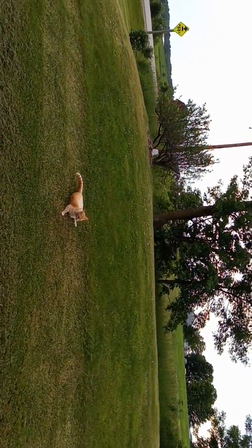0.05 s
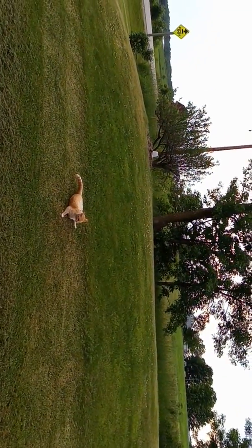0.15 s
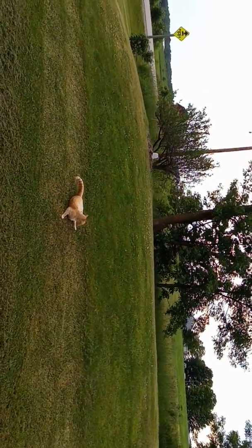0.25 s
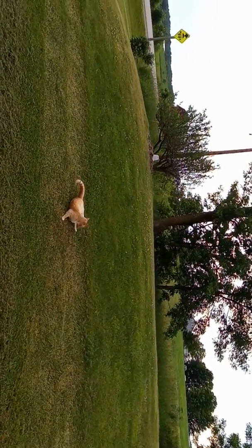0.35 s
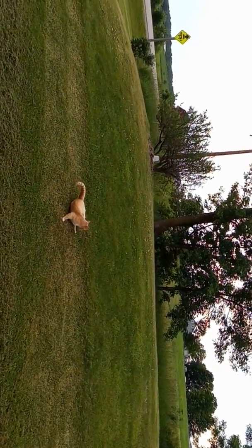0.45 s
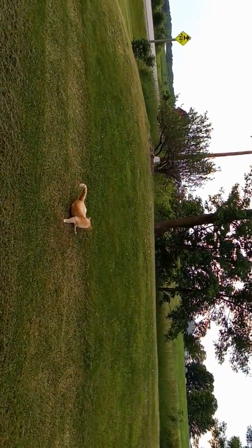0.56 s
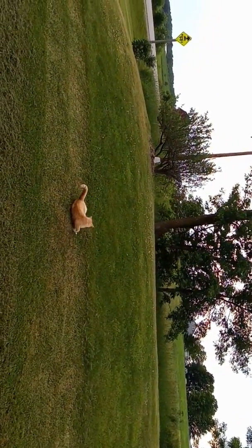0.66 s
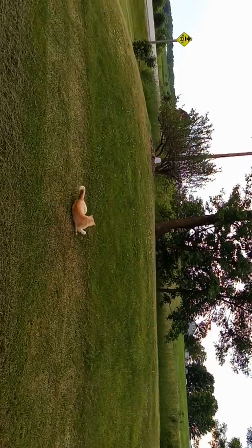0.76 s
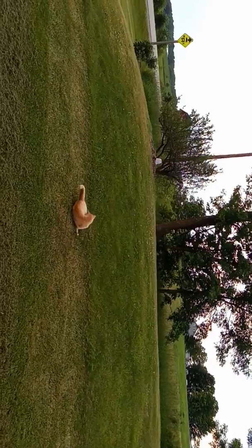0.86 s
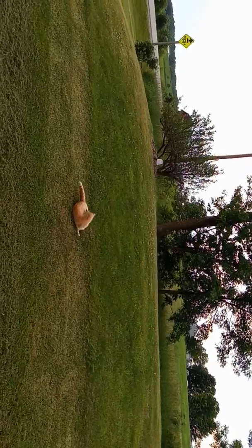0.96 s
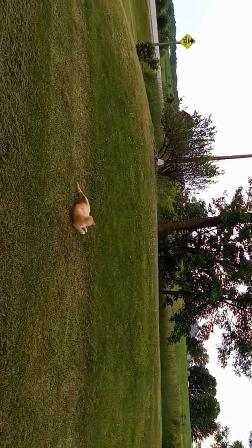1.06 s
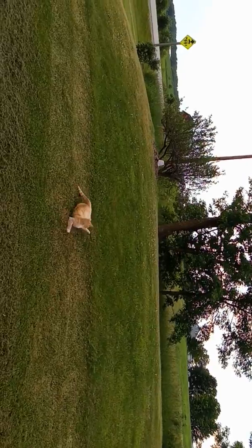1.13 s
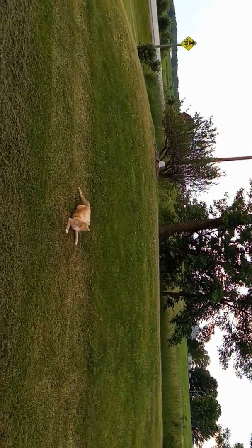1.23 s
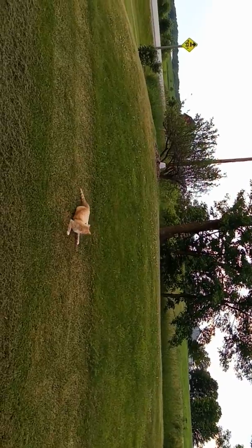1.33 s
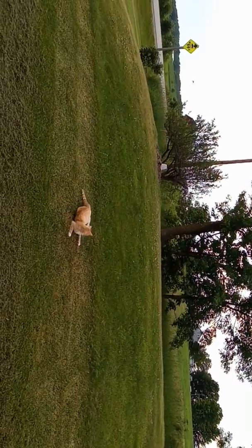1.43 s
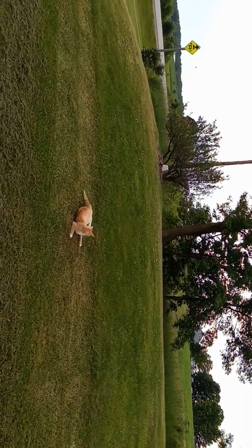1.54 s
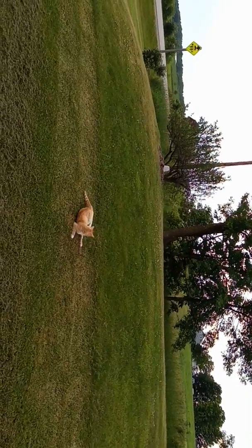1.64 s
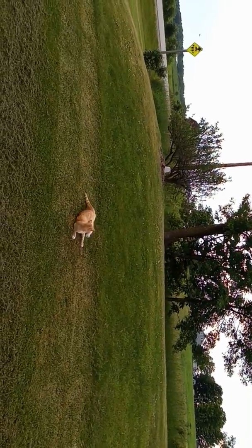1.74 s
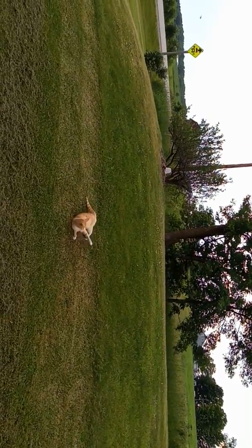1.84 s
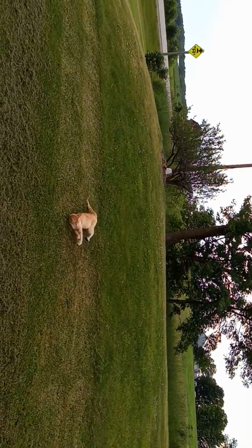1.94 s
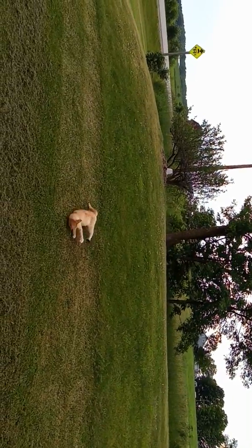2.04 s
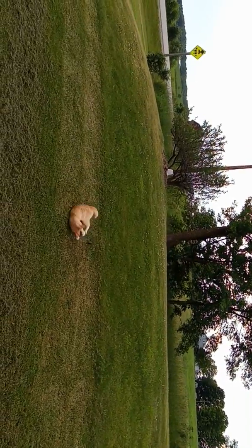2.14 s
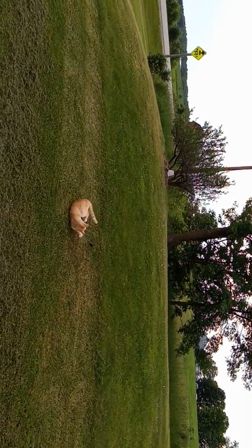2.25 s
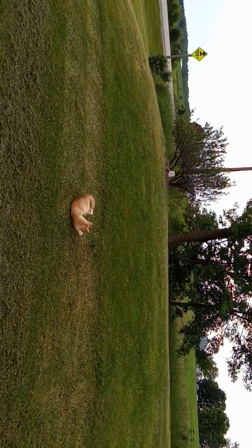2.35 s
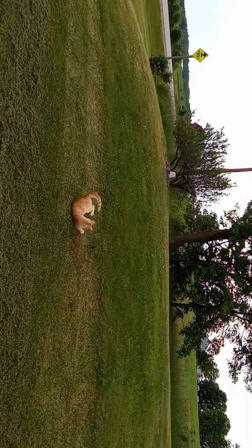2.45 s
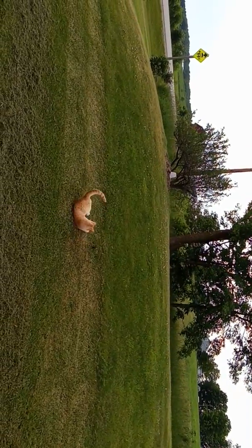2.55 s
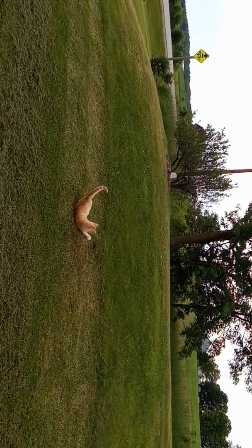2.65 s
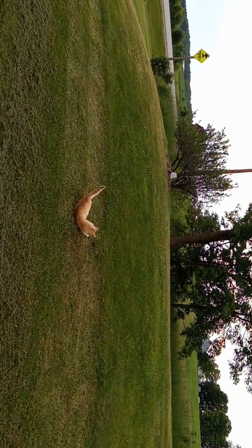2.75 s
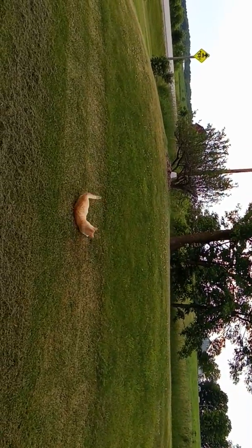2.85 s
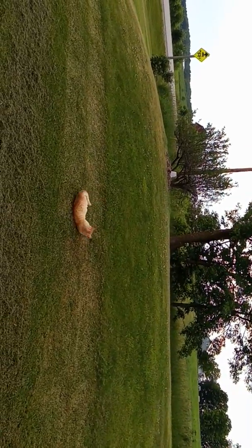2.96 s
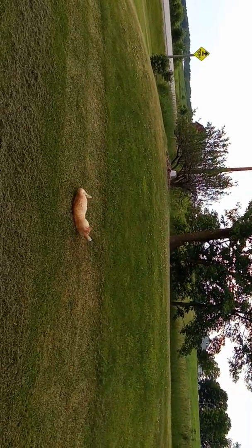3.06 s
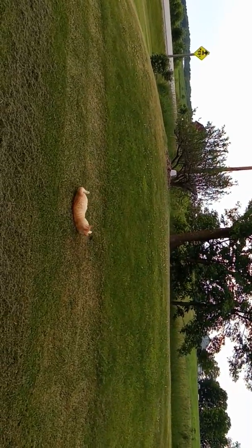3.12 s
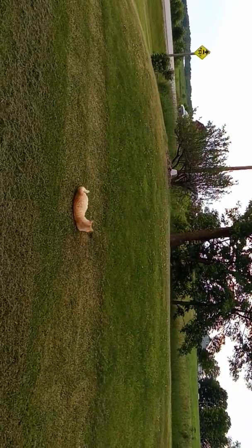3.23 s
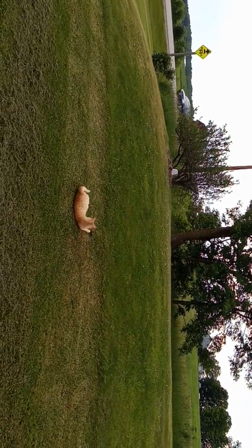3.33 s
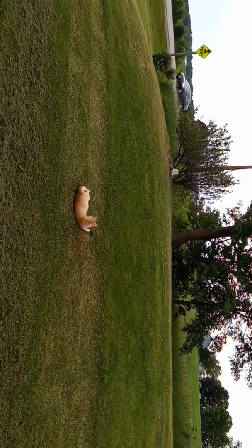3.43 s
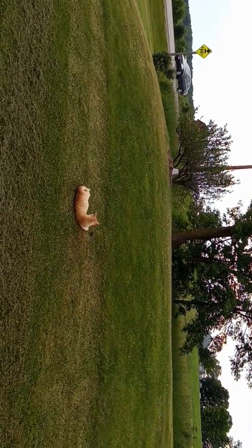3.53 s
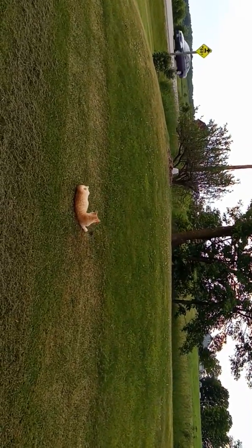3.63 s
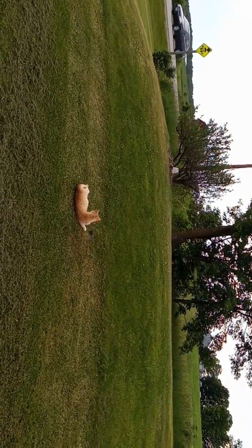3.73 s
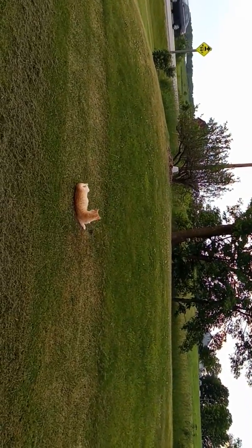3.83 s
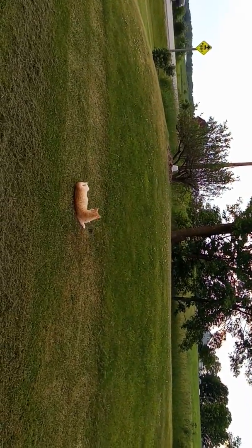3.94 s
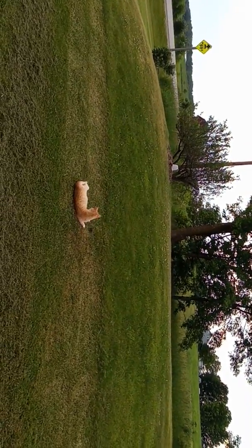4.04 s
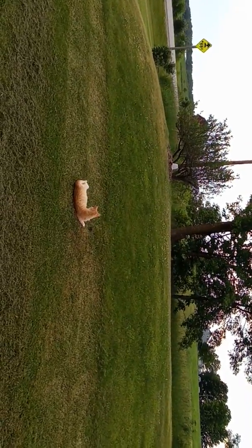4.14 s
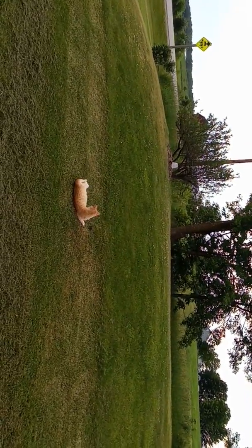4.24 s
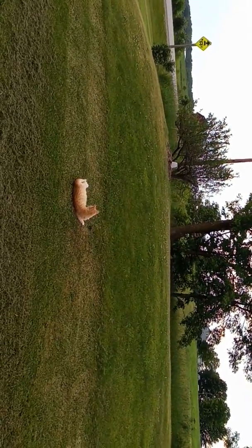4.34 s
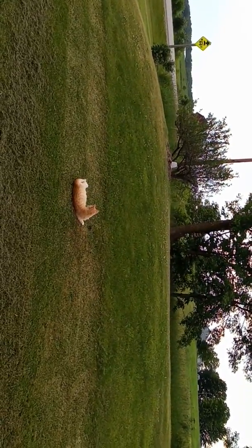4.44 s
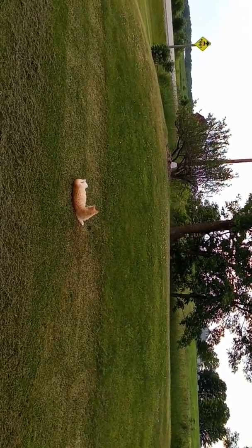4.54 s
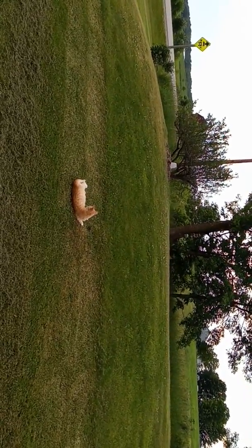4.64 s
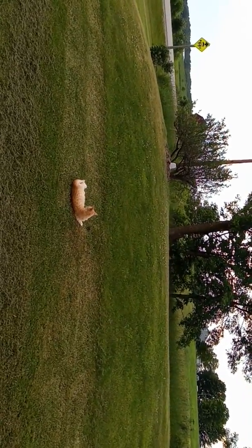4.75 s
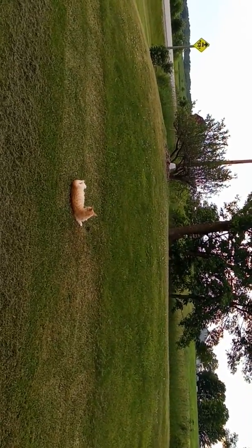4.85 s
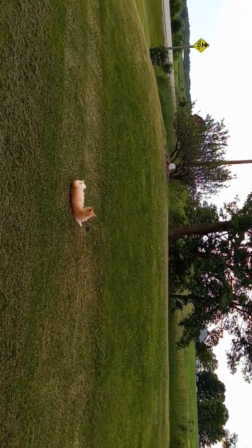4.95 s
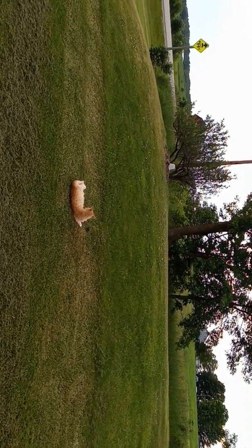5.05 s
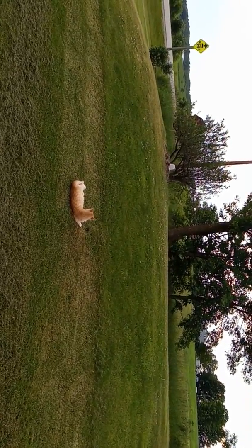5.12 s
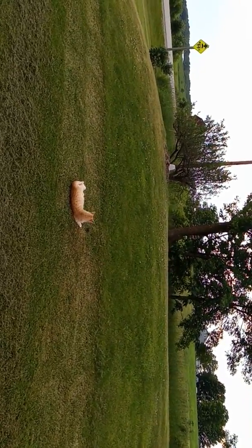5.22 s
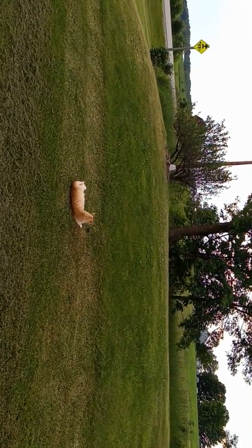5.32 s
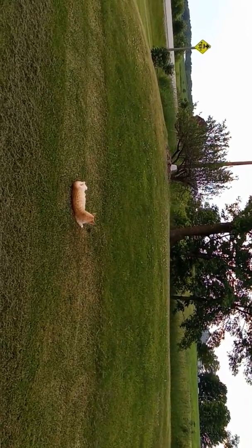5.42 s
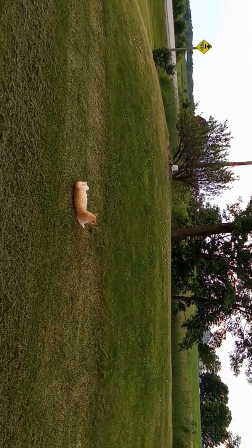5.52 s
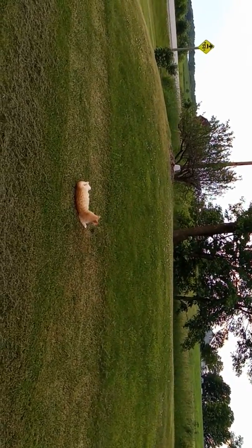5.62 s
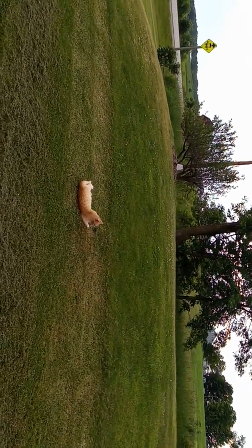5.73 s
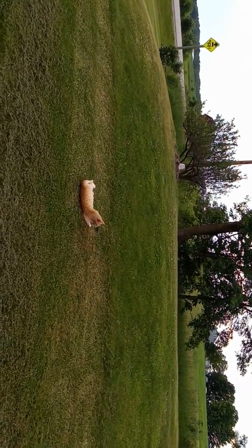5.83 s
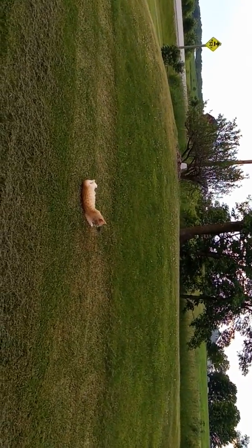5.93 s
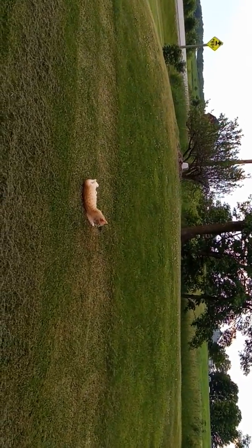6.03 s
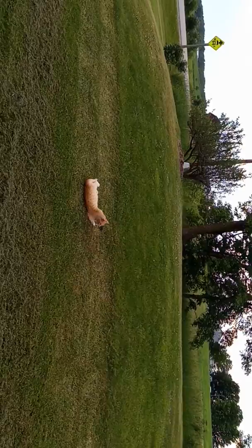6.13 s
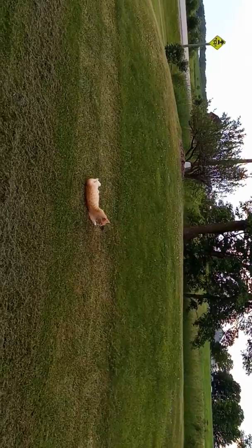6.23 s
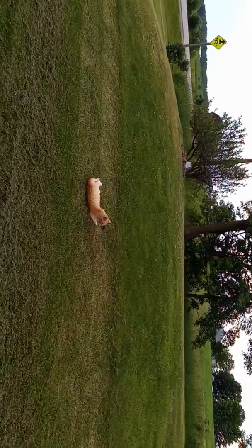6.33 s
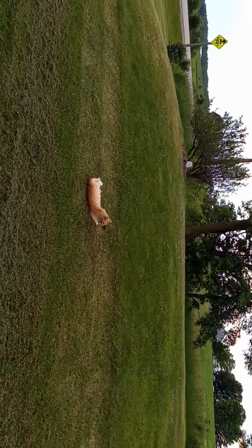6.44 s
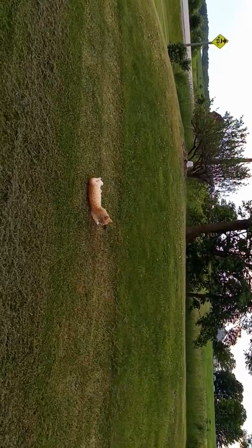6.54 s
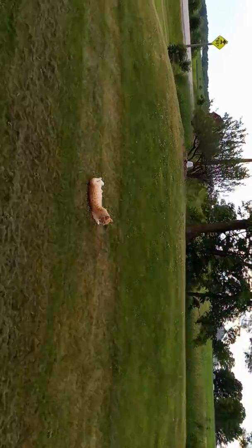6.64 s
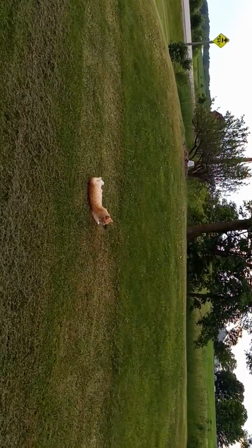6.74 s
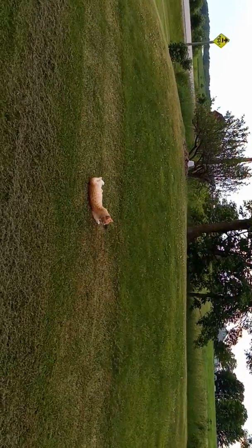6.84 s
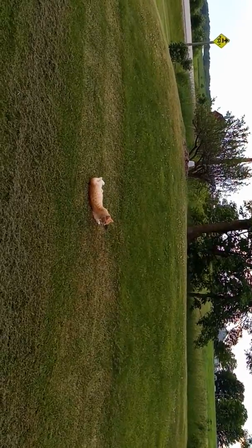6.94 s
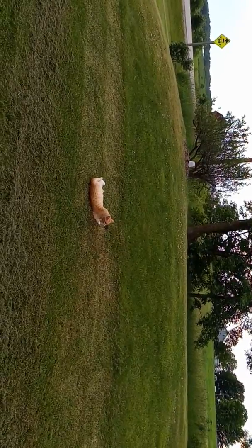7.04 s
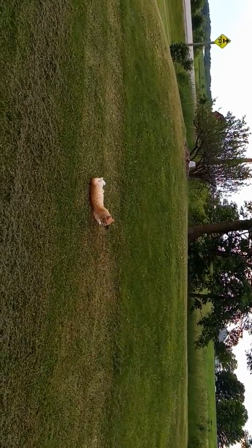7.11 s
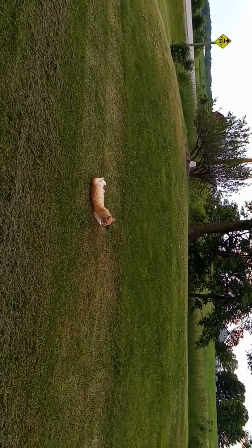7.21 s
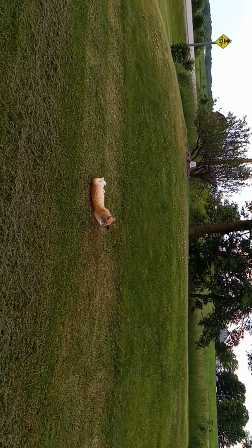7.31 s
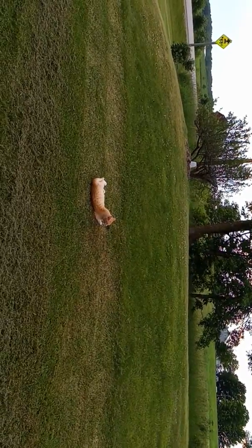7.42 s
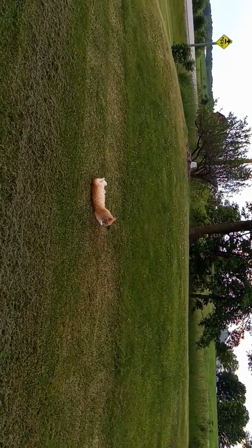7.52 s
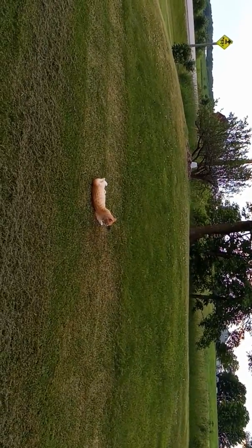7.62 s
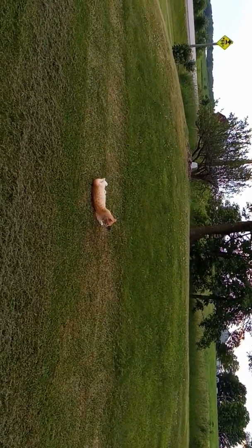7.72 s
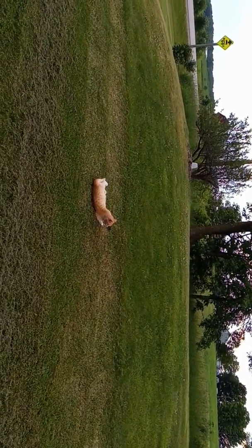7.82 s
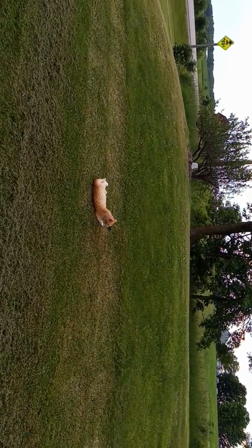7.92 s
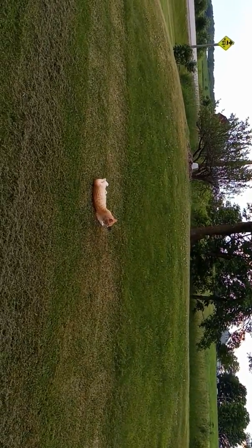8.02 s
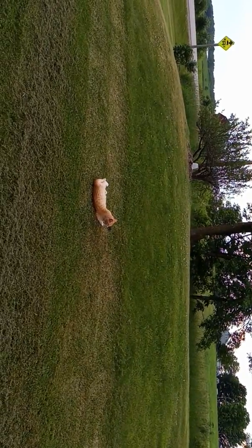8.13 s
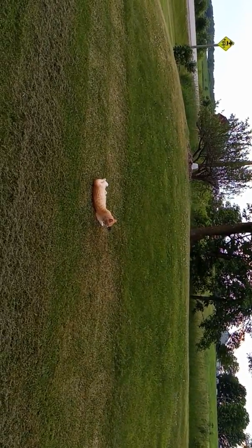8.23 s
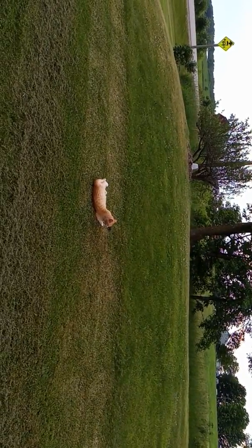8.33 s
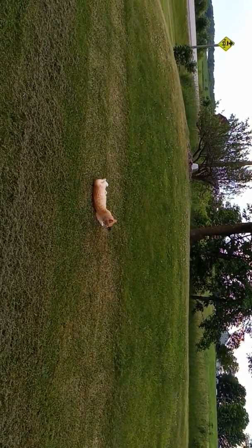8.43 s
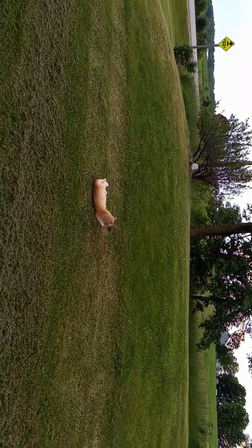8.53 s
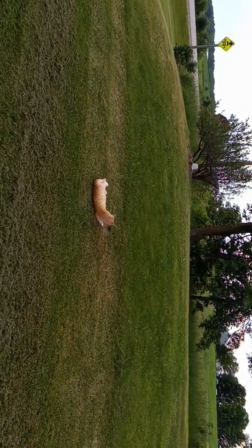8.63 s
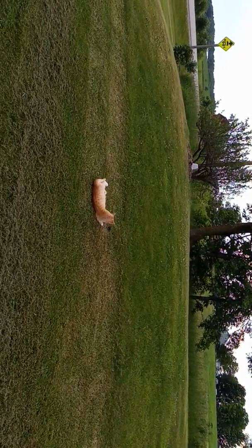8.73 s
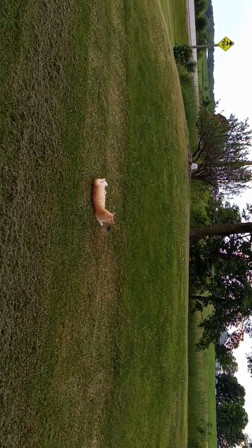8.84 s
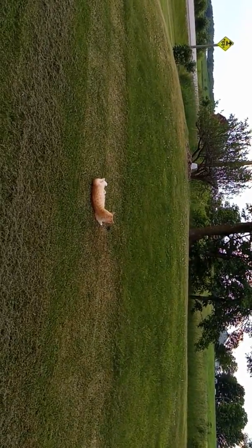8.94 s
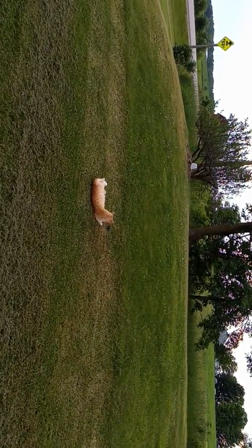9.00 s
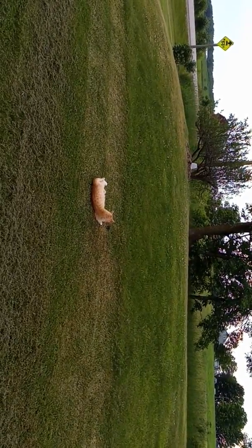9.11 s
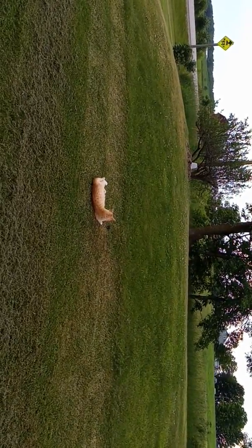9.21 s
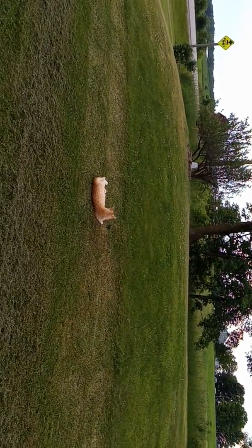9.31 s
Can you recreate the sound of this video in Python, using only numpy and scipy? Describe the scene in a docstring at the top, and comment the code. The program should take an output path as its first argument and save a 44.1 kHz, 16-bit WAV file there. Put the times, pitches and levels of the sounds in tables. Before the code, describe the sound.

A car passes on a country road beyond a wide lawn, its tyre roar swelling and fading while sparrows chirrup and a bird whistles three times.

```python
"""On a country road beyond a wide lawn a car passes: exhaust rumble, tyre roar and hiss swell and fade.
The car is shaped noise, heard by two microphone ports in one case from a changing bearing.
One bird whistles three times and sparrows chirrup and chip, all near sines with gliding pitch.
Tree echoes follow the birds; a thin far tone comes late; country noise and microphone hiss lie beneath.
"""
import sys
import numpy as np
from scipy import signal
from scipy.io import wavfile
from scipy.ndimage import uniform_filter1d

SR = 44100
rng = np.random.default_rng(int(sys.argv[2]) if len(sys.argv) > 2 else 0)


def materialize(psi):
    """Save the field psi as 16-bit PCM at rate SR to the path in sys.argv[1].

    A 1-D psi becomes a single channel; in a 2-D psi each row is a channel.
    """
    bounded = np.clip(np.atleast_2d(psi).T, -1, 1)
    quanta = np.round(bounded * 32767).astype(np.int16)
    wavfile.write(sys.argv[1], SR, quanta)


N = 413216  # samples

# --- the tables and settings
FRAME = 2048  # samples per short-time spectrum
NEAREST_S, SPEED_M_PER_S, ROAD_M = 4.63, 18.67, 33.1  # the car's path along the straight road
BASS_BELOW_HZ = 300  # parts under this follow the bass curve
# basic spectrum of the car across the grass, before the part gains: (frequency [Hz], density [dB per Hz])
CAR_SPECTRUM = [(32, -99), (70, -85), (120, -76), (230, -90), (430, -96), (780, -90), (900, -85.5),
                (1300, -86.5), (1750, -82), (3000, -92), (4200, -94), (5000, -97), (6700, -99),
                (7900, -108), (8700, -117), (10000, -122), (13900, -132), (15000, -117)]
# exhaust, body boom, grass dip, tread, tyre horn, sizzle, hiss, air:
# (frequency [Hz], gain when nearest [dB], loss over grass and air [dB per m], lift from behind [dB],
#  share of the level curve [ratio], share of the treble curve [ratio])
CAR_PARTS = [(114, 7.5, 0.1, -1.5, 0.34, .01), (255, 19, 0.52, 4, 0.35, .01),
             (560, 11, 0.3355, -5, 0.78, .01), (1030, 13, 0.2831, -4.5, 0.67, 0.073),
             (1920, 10, 0.22, -2, 0.78, 0.23), (3570, 9, 0.37, -1, 0.62, 0.41),
             (7700, 16.5, 0.65, -0.1, 0.27, 0.94), (9400, 17.5, 1.03, 1.5, 0.68, 1)]
# level, treble and bass of the car rise and fall as it passes:
# (time [s], level [dB], treble [dB], bass [dB])
WAVER = [(0, 4.5, 14.5, -1), (.6, 2, 8, -1.5), (1.2, -1.5, 10, -1), (1.6, -2.5, 0.7, 1), (2.4, -4, 1, -0.5),
         (2.75, 0, -4.5, 0), (3.05, 1.5, -13.5, -3.5), (3.5, -6, -1, 0.5), (4.2, 1, -1, 2),
         (4.8, -4, -1.5, 3.5), (5.15, -0.5, -2, -0.5), (5.55, -2, 1.8, -2.5), (6.0, 2.5, 1.5, -2),
         (6.6, -4, 3, -2), (7.4, 1.5, -2, -0.5), (8.101, 4, -1, -3), (8.8, 6, -4, 1.5), (9.37, 1.5, 6, 4.5)]
# ranges of the roar that swell or sink for a moment:
# (middle time [s], spread in time [s], frequency [Hz], spread in pitch [octaves], gain [dB])
SWELLS = [(2.3, 0.3, 2390, 0.26, 7), (6.8, 0.11, 2670, 0.31, 7), (4.5, 0.17, 2220, 0.14, 5),
          (4.9, 0.8, 45, 0.19, -7), (5.36, 0.41, 400, 0.27, 2.5), (1.65, 0.91, 320, 0.65, -6),
          (3.5, 0.34, 580, 0.13, 6), (3.03, 0.24, 1800, 0.31, -6.5), (0.24, 0.36, 2330, 0.31, 4),
          (6.32, 0.51, 470, 0.24, 9.5), (4.09, 0.23, 1670, 0.29, 3.5), (0.67, 1, 363, 0.53, 12),
          (8.95, 0.42, 500, 0.13, -9), (6.84, 0.35, 690, 0.073, 6), (4.15, 0.23, 410, 0.32, -5),
          (2.29, 0.37, 3850, 0.26, 5.5), (1.1, 0.77, 915, 0.12, 4), (1.27, 0.29, 1380, 0.12, -5),
          (8.1, 1, 186, 0.082, 5.5), (3.55, 0.23, 14300, 0.76, 7), (.9, 1, 5900, 0.19, 4),
          (5.63, 0.25, 2540, 0.21, 1), (5.85, 0.27, 940, 0.12, -6.5), (4.04, .25, 2070, 0.18, 2),
          (7.6, 0.22, 530, 0.3, 9), (5.55, .3, 66, 0.35, 7), (8.3, 1, 1550, 0.081, 3.5),
          (4.88, 0.13, 800, 0.18, 6), (0.39, .6, 250, 0.17, 2.5), (5.8, 0.076, 4700, 0.094, 3.5),
          (2.99, 0.094, 1000, 0.18, -1.5), (5.56, .04, 3400, 1.8, -3.5), (4.1, 0.084, 2150, 0.33, -1.5),
          (6.1, 0.27, 700, 0.081, 6.5), (2.75, 0.18, 3400, 0.44, -3.5), (0.75, 0.26, 145, 0.22, 3),
          (8.3, 0.75, 1700, 0.27, -5), (4.23, 0.11, 1450, .12, 1), (5.88, .15, 1430, .12, 5),
          (0.48, 0.16, 1850, 0.2, 2.5), (8.04, 0.39, 500, 0.21, -2.5)]
# left port against the right as the bearing turns:
# (time [s], lag [ms], notch [Hz], case echo strength [ratio])
CASE_ECHO = [(0, -.04, 5400, 1.2), (1.8, -.01, 4850, 1.25), (2.6, .03, 4800, 1.25), (3.1, .08, 4150, 1.5),
             (3.8, .215, 3900, 1.9), (4.5, .39, 3800, 1.9), (4.9, .473, 4100, 1.6), (5.1, .485, 4900, .4),
             (5.22, .48, 6000, .1), (5.35, .47, 7300, .55), (5.75, .425, 6000, .7), (6.0, .4, 5450, 1.3),
             (6.6, .35, 4750, 1.4), (7.3, .3, 4400, 1.3), (8.3, .28, 4600, 1.3), (9.37, .27, 5000, 1.3)]
# below the notch the left port leads: peak lead, its place as a share of the notch frequency, its spread
LEAD_RAD, LEAD_PLACE, LEAD_OCTAVES = .95, .75, .6
# lifts that the case gives the left port:
# (time [s], lift [Hz], lift [dB], dip below the lift [dB], treble lift [Hz], treble lift [dB],
#  shoulder above the lift [dB])
CASE_LIFTS = [(0, 2090, 9.5, -1, 7430, 17, 7), (2.4, 2280, 10, -0.5, 7500, 13.5, 5),
              (3.5, 2090, 9.5, -0.5, 7040, 8, 3), (4.5, 2270, 10.5, -0.5, 6400, 5, -2.5),
              (5.0, 2140, 8, -1, 6600, 2.5, -3.5), (5.45, 2380, 4.5, 0, 8400, 6.5, 0),
              (5.9, 2670, 10, -17, 8000, 8, -3.5), (6.6, 3040, 7.5, -5.5, 7650, 3.5, -1.5),
              (7.5, 2750, 7, -7.5, 7000, 6, -2), (9.37, 2750, 8.5, -7.5, 7500, 5, 1)]
# sound arriving from all round, before screening: (frequency [Hz], share [ratio])
SCATTERED_SHARE = [(30, .2), (120, .015), (500, .07), (1000, .08), (2000, .1), (4000, .14), (7000, .24),
                   (12000, .3)]
# scattering grows where trees or the lie of the land screen the car: (time [s], factor [ratio])
SCREENING = [(0, 1.3), (1.8, 1.2), (2.6, .7), (3.3, .7), (3.8, 1), (4.5, 1.2), (5.2, .55), (6.2, .5),
             (6.7, 1), (7.2, 3), (8, 5), (9.37, 6)]
# echo off the body of whoever holds the microphones:
# (time [s], delay [ms], strength left [ratio], strength right [ratio])
BODY_ECHO = [(0, 1.9, 0.037, 0.35), (3.699, 2.01, 0.27, 0.47), (4.3, 1.82, 0, 0.36),
             (4.8, 1.51, 0.27, 0.48), (5.4, 0.98, 0, 0.19), (5.9, 1.7, .0, 0)]

# the whistles, level before pan and flutter:
# (time [s], length [s], start pitch [Hz], sag [Hz], sag time [s], climb back [Hz], climb time [s],
#  fade time [s], level [dB rms], left minus right [dB])
WHISTLES = [(2.294, .178, 5305, 90, .103, 60, .012, .108, -46.5, 3),
            (2.695, .205, 5150, 105, .1, 80, .075, .175, -50, 8),
            (3.09, .225, 5110, 195, .07, 90, .15, .17, -47, 4)]
# the whistle's envelope; each fall is relative to the level just before it
ATTACK_S, HOLD_S, RELEASE_S, ATTACK_DB, FADE_DB, RELEASE_DB = 0.012, 0.03, 0.015, -6, -10.5, -16
# ticks that open a whistle: (time before it [ms], from pitch [Hz], to pitch [Hz], level [dB rms])
STUTTER = [(17, 6900, 6300, -58), (13, 6900, 6100, -53), (13, 4600, 5100, -58), (8, 4700, 5400, -54),
           (7, 6200, 5400, -52), (4, 5600, 4400, -54), (3, 5400, 5100, -51), (2, 4500, 3900, -60)]
# one chirrup as a list of strokes, sung with both sides of the syrinx, before each call's factors:
# (time [ms], pitch [Hz], relative level [dB])
CHIRRUP_STROKES = [
    [(-34, 5700, -17), (-24, 5950, -15), (-16, 5700, -14), (-10, 5600, -22), (-7, 5550, -9),
     (-5, 5500, -14), (-3, 5500, -6), (0, 5600, -12)],
    [(-1, 3250, -12), (4, 3650, -4), (10, 4050, -3), (16, 4280, -1), (21, 4180, -2), (27, 3700, 0),
     (29, 3800, 0), (32, 4700, -6)],
    [(0, 3800, -14), (4, 4400, -11), (9, 4650, -11), (18, 4830, -8), (24, 4600, -12), (27, 4300, -12),
     (33, 4900, -7)],
    [(31, 4300, -8), (36, 3500, -4), (39, 3200, -8)],
    [(42, 4600, -11), (50, 4750, -14)],
    [(47, 3550, -5), (54, 3900, -2), (63, 4300, -2)],
    [(50, 3300, -5), (58, 3600, 2), (62, 4100, 1), (66, 3450, -1), (71, 3280, 0), (74, 3500, -1),
     (76, 4150, -5)],
    [(63, 4300, -5), (69, 3900, -11), (76, 4250, -10)],
    [(80, 3900, -12), (84, 3400, -9), (88, 3700, -13)],
]
# the chirrups, level before pan, shade and flutter:
# (time [s], level [dB rms], pitch factor [ratio], length factor [ratio], left minus right [dB])
CHIRRUPS = [(.302, -59.5, 1.0, 1.0, -1), (1.402, -59, 1.01, 1.0, -1), (2.32, -59.5, 1.01, .98, -2),
            (6.068, -53.5, 1.02, .97, 0), (6.456, -56, 1.02, .99, -2), (7.48, -53.5, 1.0, 1.0, -2)]
# short chips, and the overlapping strokes of a faint far chirrup near 8.4 s;
# level at their start before pan and flutter:
# (time [s], start pitch [Hz], end pitch [Hz], length [ms], level [dB rms], left minus right [dB])
CHIPS = [(3.592, 5250, 4400, 15, -52, -3), (3.607, 4000, 3400, 12, -59, -3),
         (4.106, 5200, 3700, 14, -56, -3), (4.286, 5100, 3500, 18, -60, -3),
         (3.495, 7800, 7750, 25, -61, 2), (7.862, 4100, 3600, 18, -69, 1), (8.402, 4450, 3850, 22, -64, 3),
         (8.404, 4750, 4200, 18, -72, 3), (8.472, 4000, 3750, 11, -64, 3), (8.388, 3900, 4450, 12, -69, 3),
         (2.222, 4600, 4500, 20, -66, -2)]
SHADE_DB_PER_OCTAVE = 14  # the case tilts chirrup notes above 4 kHz away from the left port
TREELINE_S, TREELINE_DEPTH_S, TREELINE_DB = .11, .022, -43  # smeared echo from the row of trees

# a thin far tone: (time [s], pitch [Hz], level [dB rms])
FAR_TONE = [(8.85, 2870, -90), (9.05, 2870, -79), (9.36, 2870, -79)]
# breeze, far traffic and leaves, before the left trim: (frequency [Hz], density [dB per Hz])
COUNTRY = [(22, -100), (50, -104), (200, -106), (330, -116), (620, -117), (690, -106), (1500, -104),
           (2200, -107), (3500, -107), (5000, -111), (7400, -113), (8400, -135)]
COUNTRY_ALIKE_BELOW_HZ = 400  # longer waves reach both ports alike
# microphone hiss, before its high-pass: (frequency [Hz], density [dB per Hz])
SELF_NOISE = [(7000, -130), (11000, -131), (13900, -137), (15000, -123)]
CUTOFF_HZ = 15550  # top of the microphones' range


def car():
    """Rolling noise; part arrives directly, part scattered by trees and air, unlike at the two ports."""
    hz, s, (direct, round_left, round_right) = noise_frames(channels=3)
    level = amp(at_hz(CAR_SPECTRUM, hz) + part_gain_db(hz, s))
    level = level * swells(hz, s) * patches(level.shape, db=1.2)

    path, colour = left_port(hz, s)
    scattered = np.clip(at_hz(SCATTERED_SHARE, hz) * curves(SCREENING, s)[0], 0, .92)
    direct_gain = np.sqrt(1 - scattered)
    # the case's notch is partly filled in for sound from all round
    left_scatter_gain = 1.2 * np.sqrt(scattered * (.2 + .8 * abs(path)))
    left = colour * (direct_gain * path * direct + left_scatter_gain * round_left)
    right = direct_gain * direct + np.sqrt(scattered) * round_right
    return to_sound(level * body_echo(hz, s) * np.array([left, right]))


def part_gain_db(hz, s):
    """Spread the gains of the car's parts over the spectrum, each part ruling its own range."""
    count = len(CAR_PARTS)
    part_hz = np.array(CAR_PARTS)[:, 0]
    place = np.interp(np.log(hz[:, 0]), np.log(part_hz), np.arange(count))
    low = np.minimum(place.astype(int), count - 2)
    share = np.clip(1.17 * (place - low - .5) + .5, 0, 1)[:, None]
    gain_db = parts_db(s)
    return (1 - share) * gain_db[low] + share * gain_db[low + 1]


def parts_db(s):
    """Gain of each part: spreading, loss with distance, front-to-back change and wavering."""
    hz, near_db, loss, behind_db, level_share, treble_share = np.transpose(CAR_PARTS)[..., None]
    metres, behind = bearing(s)
    level_db, treble_db, bass_db = curves(WAVER, s)
    waver_db = level_share * level_db + treble_share * treble_db
    waver_db = waver_db + (hz < BASS_BELOW_HZ) * bass_db
    spreading_db = -20 * np.log10(metres / ROAD_M)
    ground_air_db = -loss * (metres - ROAD_M)
    return near_db + spreading_db + ground_air_db + behind_db * behind + waver_db


def bearing(s):
    """Distance in metres and sine of the bearing (towards -1 coming, towards +1 leaving)."""
    along = SPEED_M_PER_S * (s - NEAREST_S)
    metres = np.hypot(along, ROAD_M)
    return metres, along / metres


def swells(hz, s):
    """Gain of the brief swells and dips, each a smooth bump in time and pitch."""
    total_db = 0
    for at, spread_s, centre_hz, octaves, db in SWELLS:
        in_time = ((s - at) / spread_s) ** 2
        in_pitch = (np.log2(hz / centre_hz) / octaves) ** 2
        total_db = total_db + db * np.exp(-.5 * in_time - .5 * in_pitch)
    return amp(total_db)


def patches(shape, db):
    """Moving air makes ranges of a far sound swell and sink for a fraction of a second."""
    field = rng.standard_normal(shape)
    field = uniform_filter1d(field, size=13, axis=0)  # smooth over frequency
    field = uniform_filter1d(field, size=15, axis=1)  # smooth over time
    return amp(db * field / field.std())


def left_port(hz, s):
    """Left port against the right: a lag and case echo (path), and the lifts of the case (colour)."""
    lag_ms, notch_hz, echo = curves(CASE_ECHO, s)
    lift_hz, lift_db, dip_db, treble_hz, treble_db, shoulder_db = curves(CASE_LIFTS, s)
    turn = np.pi * hz / notch_hz  # direct and echo are half a wave apart at the notch
    echo = echo / (1 + (hz / 8500) ** 6)  # the case echo fades out above about 8.5 kHz
    comb = (1 + echo * np.exp(-1j * turn)) / (1 + echo)
    comb = comb * np.exp(.15j * turn)  # a slight advance on top of the lag
    off_place = np.log2(hz / notch_hz / LEAD_PLACE) / LEAD_OCTAVES
    comb = comb * np.exp(1j * LEAD_RAD * np.exp(-.5 * off_place ** 2))
    lag = np.exp(-2j * np.pi * hz * lag_ms / 1000)

    colour = resonance(hz, lift_hz, 0.82, lift_db, lead=0.14)
    colour = colour * resonance(hz, lift_hz * 0.61, 0.24, dip_db, lead=0.11)
    colour = colour * resonance(hz, treble_hz, 0.25, treble_db, lead=0.019)
    colour = colour * resonance(hz, 3700, 0.24, shoulder_db, lead=.02)
    return lag * comb, colour


def resonance(hz, centre_hz, octaves, top_db, lead):
    """A lift whose phase leads below its centre and trails above it; a dip turns the other way."""
    x = np.log2(hz / centre_hz) / octaves
    shape_db = top_db * np.exp(-.5 * x ** 2)
    return amp(shape_db) * np.exp(-1j * lead * x * shape_db)


def body_echo(hz, s):
    """A soft reflector close behind: a comb in the low and middle range of each channel."""
    ms, *strengths = curves(BODY_ECHO, s)
    echo = np.exp(-2j * np.pi * hz * ms / 1000) / (1 + (hz / 3200) ** 4)
    return np.array([1 + np.clip(strength, 0, .8) * echo for strength in strengths])


def whistler():
    """Each whistle opens with a short two-voiced stutter, then a fading tone that sags and recovers."""
    out = np.zeros((2, N))
    for s, length, hz, sag_hz, sag_s, climb_hz, climb_s, fade_s, db, pan_db in WHISTLES:
        pitch_times = [0, sag_s, sag_s + climb_s]
        level_times = [0, ATTACK_S, ATTACK_S + HOLD_S, fade_s, length - RELEASE_S, length]
        after = np.sort(level_times + pitch_times[1:])
        pitch = hz + np.interp(after, pitch_times, [0, -sag_hz, climb_hz - sag_hz])
        envelope_db = [ATTACK_DB, 0, 0, FADE_DB, FADE_DB, FADE_DB + RELEASE_DB]
        level = db + np.interp(after, level_times, envelope_db)
        rows = np.transpose([s + after, pitch, level])
        add_stroke(out, rows, pan_db, lag_ms=.02, third_db=-34, flutter_db=1.2, wobble=.002)
        for ms, from_hz, to_hz, tick_db in STUTTER:
            start = s - ms / 1000
            tick = [(start, from_hz, tick_db), (start + .0035, to_hz, tick_db)]
            add_stroke(out, tick, pan_db / 2, lag_ms=.02, flutter_db=3)
    return out


def sparrows():
    """Chirrups rescale one pattern; short slides make the chips and a faint far chirrup near 8.4 s."""
    out = np.zeros((2, N))
    for s, db, pitch, length, pan_db in CHIRRUPS:
        for stroke in CHIRRUP_STROKES:
            rows = np.array(stroke) * [length / 1000, pitch, 1] + [s, 0, db]
            add_stroke(out, rows, pan_db, lag_ms=.02, flutter_db=3,
                       shade_db=SHADE_DB_PER_OCTAVE, wobble=.017)
    for s, start_hz, end_hz, ms, db, pan_db in CHIPS:
        rows = [(s, start_hz, db), (s + ms / 1000, end_hz, db - 3)]
        add_stroke(out, rows, pan_db, lag_ms=.02, flutter_db=4, wobble=.035)
    return out


def add_stroke(out, rows, pan_db, lag_ms, third_db=-80, flutter_db=0, shade_db=0, wobble=0):
    """Sing (time [s], pitch [Hz], level [dB rms]) rows as a near sine with flutter and pitch wobble."""
    s, hz, db = np.transpose(rows)
    t = np.arange(s[0], s[-1], 1 / SR)
    soft_ends = np.clip(np.minimum(t - s[0], s[-1] - t) / .0015, 0, 1)
    knots = np.arange(s[0], s[-1] + .003, .003)  # a new random value every 3 ms
    flutter = np.interp(t, knots, rng.standard_normal(len(knots)))
    wander = np.interp(t, knots, rng.standard_normal(len(knots)))
    pitch = np.interp(t, s, hz) * (1 + wobble * wander)
    phase = 2 * np.pi * np.cumsum(pitch) / SR
    tone = np.sin(phase) + amp(third_db) * np.sin(3 * phase)
    level = amp(np.interp(t, s, db) + flutter_db * flutter)
    tone = np.sqrt(2) * soft_ends * tone * level  # root two: peak of a sine from its rms
    pan_db = pan_db - shade_db * np.log2(pitch / 4000)
    for channel, side in enumerate((1, -1)):
        lag_s = lag_ms / 1000 if side > 0 else 0  # the left port hears it later
        at = round((s[0] + lag_s) * SR)
        out[channel, at:at + len(t)] += tone * amp(side * pan_db / 2)


def tree_echoes(x, level_db, t60, treeline_db):
    """Add a faint decaying spray of echoes and a treeline bump, drawn afresh for each channel."""
    t = np.arange(SR // 3) / SR
    treeline = amp(treeline_db) * np.exp(-.5 * ((t - TREELINE_S) / TREELINE_DEPTH_S) ** 2)
    spray = amp(level_db - 60 * t / t60) * (t > .008)
    tail = rng.standard_normal((2, len(t))) * (spray + treeline)
    return x + signal.fftconvolve(x, tail, axes=1)[:, :N]


def far_tone():
    """A thin steady near sine that fades in late, slightly delayed at the left port."""
    out = np.zeros((2, N))
    add_stroke(out, FAR_TONE, pan_db=0, lag_ms=.17)
    return out


def country():
    """Breeze, far traffic and leaves as steady noise, 1 dB lower on the left."""
    return amp([[-1.0], [0]]) * steady_noise(COUNTRY, COUNTRY_ALIKE_BELOW_HZ)


def microphone_hiss():
    """Self-noise of the microphones, kept to the treble by a high-pass."""
    high_pass = signal.butter(4, 6000, "high", fs=SR, output="sos")
    return signal.sosfilt(high_pass, steady_noise(SELF_NOISE, alike_below_hz=1))


def steady_noise(spectrum, alike_below_hz):
    """Steady noise, mostly shared by the channels in the bass and their own above."""
    hz, s, (mid, side) = noise_frames(channels=2)
    alike = .85 / (1 + (hz / alike_below_hz) ** 4)  # correlation of left and right
    side_signs = [[[1]], [[-1]]]
    frames = np.sqrt((1 + alike) / 2) * mid + np.sqrt((1 - alike) / 2) * side * side_signs
    return to_sound(frames * amp(at_hz(spectrum, hz)))


def noise_frames(channels):
    """Short-time spectra of white noise at 0 dB per Hz, with frequencies (a column) and times."""
    white = rng.standard_normal((channels, N)) * np.sqrt(SR / 2)
    hz, s, frames = signal.stft(white, SR, nperseg=FRAME, noverlap=FRAME * 3 // 4)
    return np.maximum(hz, 1)[:, None], s, frames


def to_sound(frames):
    """Overlap-add short-time spectra back into N samples."""
    return signal.istft(frames, SR, nperseg=FRAME, noverlap=FRAME * 3 // 4)[1][..., :N]


def amp(db):
    """Amplitude factor of a level in dB."""
    return 10 ** (np.asarray(db) / 20)


def at_hz(points, hz):
    """Read a two-column spectrum table, straight-lined over log frequency."""
    point_hz, values = np.transpose(points)
    return np.interp(np.log(hz), np.log(point_hz), values)


def curves(rows, s):
    """Read every column of a table at the times s; the first column is time."""
    times, *columns = np.transpose(rows)
    return [np.interp(s, times, column) for column in columns]


def scene():
    """Mix the car, the birds with their echoes, the far tone and the country noise."""
    whistles = tree_echoes(whistler(), level_db=-46, t60=.45, treeline_db=TREELINE_DB - 8)
    # the sparrows are farther off, so wetter
    chirps = tree_echoes(sparrows(), level_db=-38, t60=.4, treeline_db=TREELINE_DB)
    return car() + whistles + chirps + far_tone() + country()


def record(dry):
    """The microphones add their hiss; a steep low-pass cuts the top."""
    low_pass = signal.ellip(12, .5, 70, CUTOFF_HZ, fs=SR, output="sos")
    return signal.sosfilt(low_pass, dry + microphone_hiss())


dry = scene()
out = record(dry)
materialize(out)
```